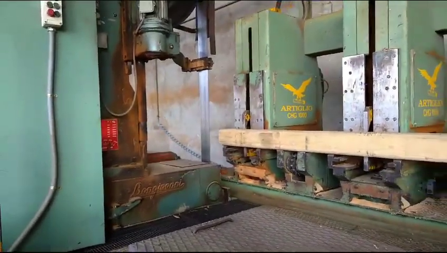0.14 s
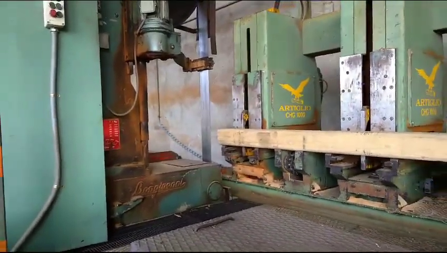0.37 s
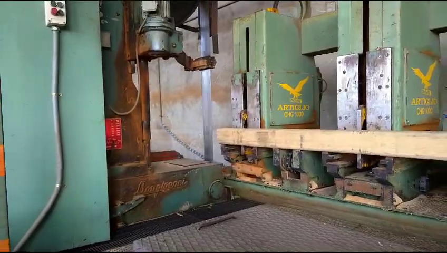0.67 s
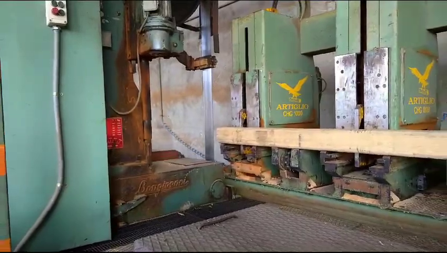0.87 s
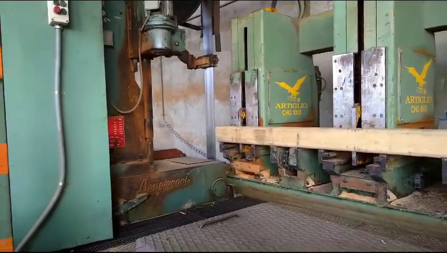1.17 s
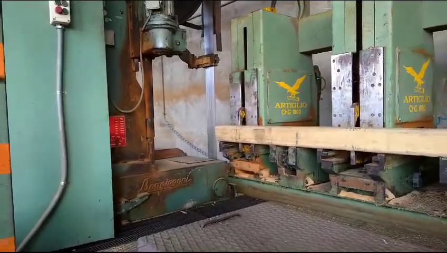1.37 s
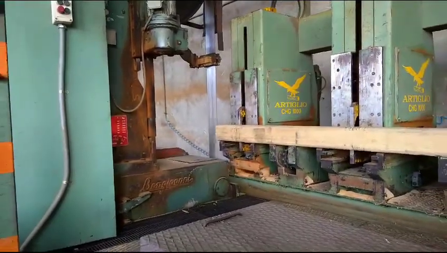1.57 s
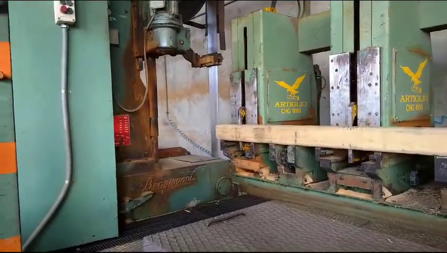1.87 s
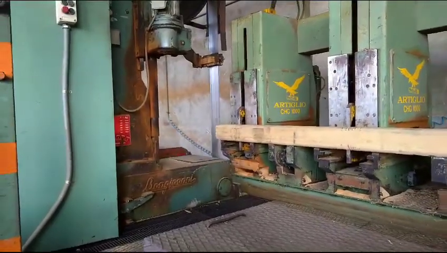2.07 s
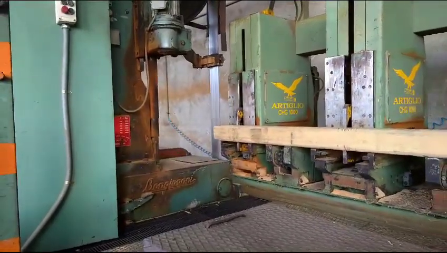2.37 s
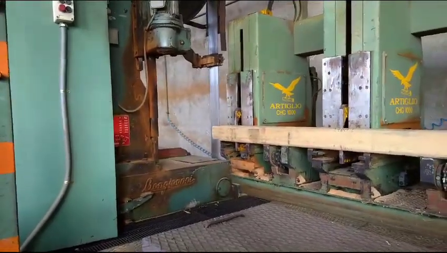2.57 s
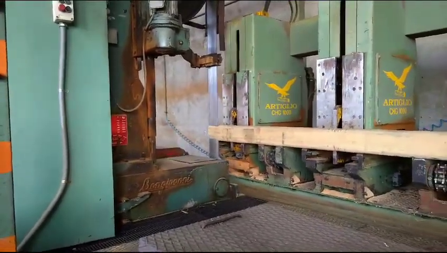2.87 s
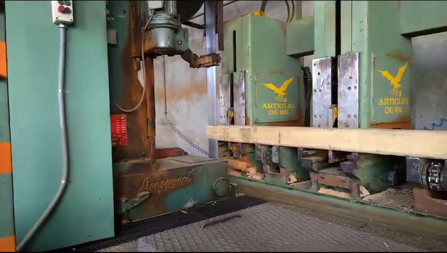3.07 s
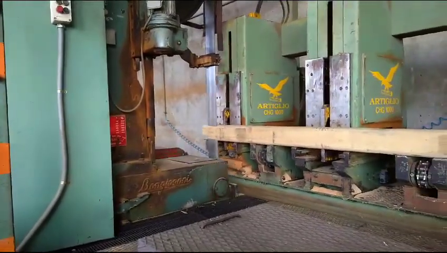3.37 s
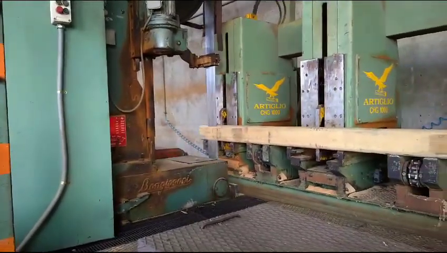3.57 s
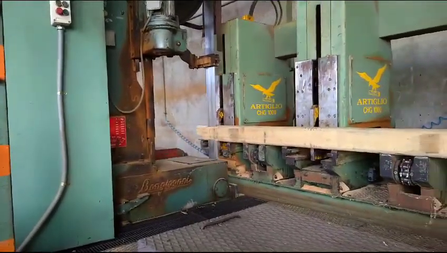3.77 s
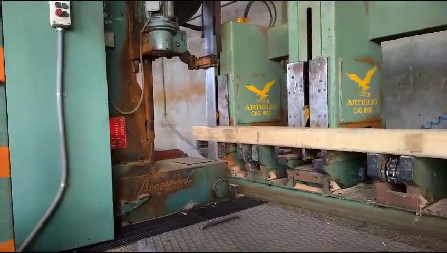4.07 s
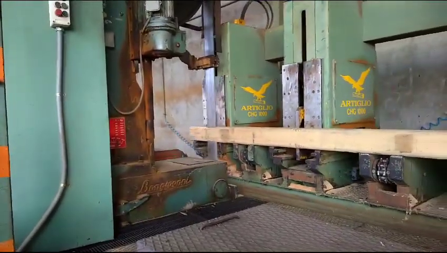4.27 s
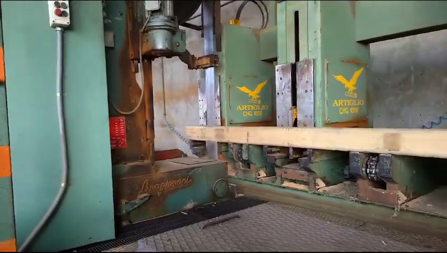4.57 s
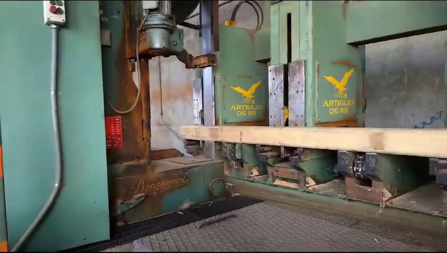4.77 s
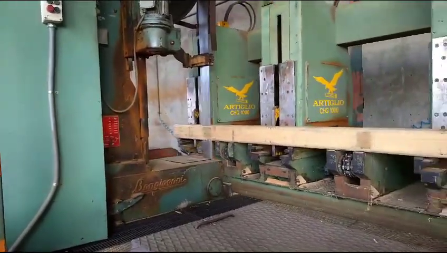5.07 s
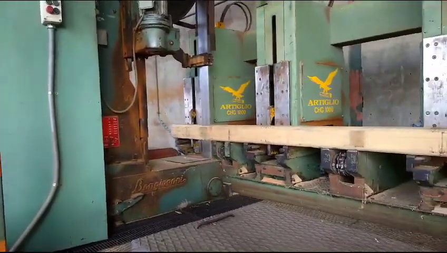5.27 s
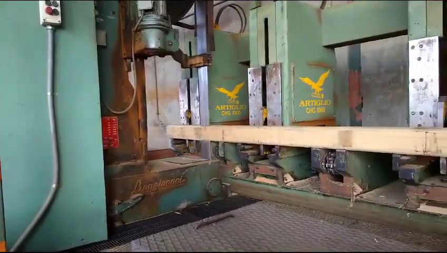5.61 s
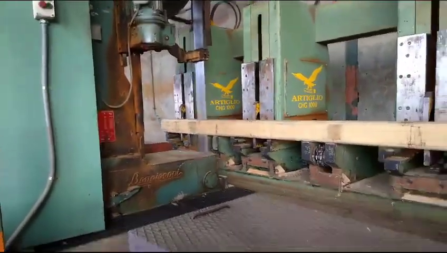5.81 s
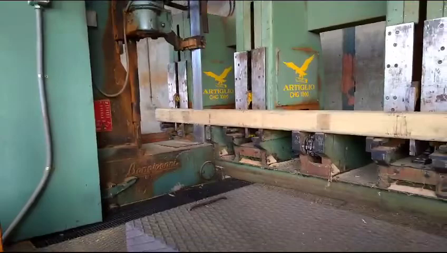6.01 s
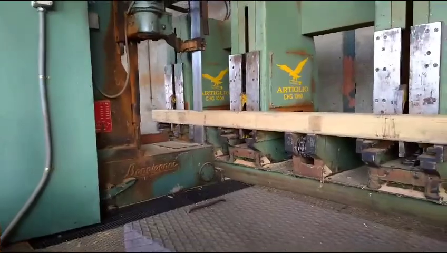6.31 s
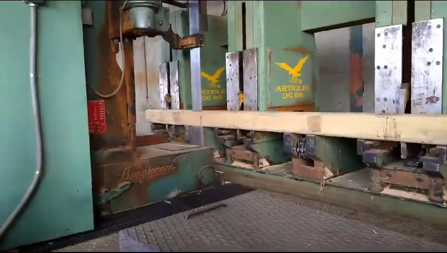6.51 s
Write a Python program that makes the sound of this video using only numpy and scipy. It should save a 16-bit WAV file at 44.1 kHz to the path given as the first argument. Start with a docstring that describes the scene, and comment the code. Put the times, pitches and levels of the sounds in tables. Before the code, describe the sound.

A large band saw idles in a sawmill shed, its rushing noise and thin tooth whistle pulsing nearly four times a second over motor hum. After just over a second the blade abruptly bites into a timber beam: a loud, rough whine and hissing torn chips, brightest at first, then slowly softer but continuous to the end. Stereo phone a few metres away, with short shed echo.

```python
"""Band saw biting into a beam in a sawmill shed

A large band saw idles, then bites into a timber beam that the carriage feeds slowly past. The running noise of
the blade loop repeats on every turn. In the cut each tooth strikes the wood, giving a rough whine on the tooth
rate over the hiss of chips. A phone with two microphone ports, a few metres away, hears it with the shed's
echo, over wavering motor tones and frame drones."""
import sys
import numpy as np
from scipy import signal
from scipy.fft import rfft, irfft, next_fast_len
from scipy.io import wavfile
from scipy.ndimage import uniform_filter1d, map_coordinates

SR = 44100
rng = np.random.default_rng(int(sys.argv[2]) if len(sys.argv) > 2 else 0)


def pcm_store(signal):
    """Save signal as 16-bit PCM."""
    levels = np.round(np.clip(np.atleast_2d(signal), -1, 1) * 32767)
    wavfile.write(sys.argv[1], SR, levels.astype(np.int16).T)


N = 293265

BITE_S, BITE_ATTACK_S = 1.285, 0.014  # the teeth reach the wood; time the bite takes to rise


def undb(db):
    """Decibels to gain."""
    return 10 ** (np.asarray(db) / 20)


def unit(x):
    """Scale to rms 1."""
    return x / np.sqrt(np.mean(x ** 2))


def curves(table):
    """Columns of a (s, value, ..) table at every sample."""
    s, *columns = np.transpose(table)
    return [np.interp(np.arange(N) / SR, s, c) for c in columns]


def over_hz(table, hz):
    """A (Hz, value) table read on a log-frequency axis."""
    f, v = np.transpose(table)
    return np.interp(np.log(hz + 1), np.log(f + 1), v)


def walk(rate):
    """Random levels held 1 / rate s and slewed twice, scaled to a spread near 1."""
    k = int(SR / rate)
    steps = np.repeat(rng.standard_normal(N // k + 1), k)
    slewed = uniform_filter1d(uniform_filter1d(steps, k), k)
    return unit(slewed)[:N] if len(slewed) == N else unit(slewed[:N])


def flickering(x, gain, flicker_db, rate):
    """Colour x by gain(Hz), each octave wavering in level on its own."""
    size = next_fast_len(N)
    hz = np.arange(size // 2 + 1) * SR / size
    spectrum = rfft(x, size) * gain(hz)
    octaves_up = np.log2(np.clip(hz, 2 ** 5, 2 ** 14))
    out = 0
    for octave in range(5, 15):
        share = np.clip(1 - abs(octaves_up - octave), 0, 1)
        band = irfft(spectrum * share, size)[..., :N]
        depth_db = flicker_db * (1.5 + 6 * (octave < 7))  # the lowest rumble is the most uneven
        out = out + band * undb(depth_db * walk(rate))
    return out


def since_bite(rise_s):
    """0 before the teeth reach the wood, then a straight rise to 1."""
    return np.clip((np.arange(N) / SR - BITE_S) / rise_s, 0, 1)


# Motor hum. Each row: time in seconds, upper tone in dB, lower tone in dB.
MOTOR_HUM = [(0, -53, -70), (.55, -48, -73), (.75, -61, -75), (1.3, -54, -74), (1.5, -46.5, -71),
             (2.05, -46, -65), (2.17, -55, -69), (2.3, -45, -72), (2.8, -52, -67), (3.4, -56.5, -63),
             (5.0, -56, -59.5), (5.5, -54, -63), (6.65, -63, -64)]
# Frame drones. Each row: time in seconds, lower tone in dB, upper tone in dB.
FRAME_DRONE = [(0.0, -62, -44), (0.11, -50, -47), (0.53, -60, -47.5), (1.78, -55, -48), (2.39, -63, -57),
               (4.09, -72, -53.5), (6.41, -70, -62), (6.65, -68, -59)]
MOTOR_HZ, DRONE_HZ = (300, 95), (238, 406.5)  # in the column order of the tables
HUM_WAVER_DB = 1.5


def hum():
    """Motor tones and frame drones: sines wavering in level and phase."""
    t = np.arange(N) / SR
    levels_db = curves(MOTOR_HUM) + curves(FRAME_DRONE)
    return sum(undb(db + HUM_WAVER_DB * walk(7.0)) * np.sin(2 * np.pi * hz * t + 0.3 * walk(5.3))
               for hz, db in zip(MOTOR_HZ + DRONE_HZ, levels_db))


SHED_T60_S = 0.39  # time for the echo to die by 60 dB
ECHO_SHIFT_S = .3  # the carriage moves, so the echo takes a new path this often


def shed(x):
    """Dense echo of the shed, different at each port and changing as the beam travels; treble dies sooner."""
    t, hop = np.arange(SR // 2) / SR, int(ECHO_SHIFT_S * SR)
    x, out = np.pad(x, (hop, 2 * hop)), np.zeros((2, N + 3 * hop + SR))
    fade = np.sin(np.pi * np.arange(2 * hop) / (2 * hop))
    for start in range(0, N + hop, hop):
        decay = np.exp(-np.log(1000) * t / SHED_T60_S) * (t > .006)  # first wall return after 6 ms
        tail = rng.standard_normal((2, len(t))) * decay
        bright = np.diff(tail, prepend=0) * np.exp(-t / 0.014)
        tail = signal.lfilter([1], [1, -.3], tail) + 0.15 * bright
        piece = x[start:start + 2 * hop] * fade
        echo = signal.fftconvolve(piece[None], tail / np.sqrt(np.sum(tail ** 2) / 2), axes=1)
        out[:, start:start + echo.shape[1]] += echo
    return out[:, hop:hop + N]


# Uneven tooth spacing round the blade loop, closer at the weld.
# Each row: place in turns, tooth rate in Hz, tooth whistle in relative dB.
BLADE_LOOP = [(0, 795.5, -1), (.16, 794, -10), (.24, 801, -10), (.29, 809, -10), (.39, 810, -10),
              (.43, 792, -11), (.58, 790, -12), (.7, 797, -10), (.8, 796, -3), (.9, 796, 1), (1, 795.5, -1)]
TURN_START = .985  # place on the loop at the start (turns)
TURN_S, LOADED_TURN_S, SLOWING_S = .27424, .2756, .3  # one turn free, one under load; time it takes to slow


def blade():
    """Place on the loop (turns), tooth phase (radians) and whistle level (dB) as the loop slows under load."""
    turn_s = TURN_S + (LOADED_TURN_S - TURN_S) * since_bite(SLOWING_S)
    place = (TURN_START + np.cumsum(1 / turn_s) / SR) % 1
    at, hz, db = np.transpose(BLADE_LOOP)
    tooth = 2 * np.pi * np.cumsum(np.interp(place, at, hz)) / SR
    return place, tooth, np.interp(place, at, db)


# Blade on its wheels and guides. Each row: time in seconds, level in dB.
RUNNING_LEVEL = [(0, -22), (1.4, -21), (2.0, -21), (3.4, -26), (4.2, -24), (5.2, -25.5), (6.65, -26.5)]
# Colour of the running noise. Each row: frequency in Hz, relative level in dB per Hz.
RUNNING_COLOUR = [(15, -66), (25, -35), (194, -20.5), (300, -14), (553, -8.5), (800, -5.5), (1000, -4.5),
                  (1760, -2), (2600, -6), (3180, -8.5), (6240, -9.5), (10000, -9.5), (13300, -14.5),
                  (15700, -20)]
# Machine frame modes. Each row: frequency in Hz, width in Hz, height in dB.
FRAME_MODES = [(240, 8, 4), (408, 12, 7), (445, 8, 4), (515, 10, 5), (600, 12, 8), (677, 12, 9),
               (1255.5, 25, 5), (1481, 32, 6.5), (1740, 57, 5), (2320, 44, 9), (2498, 35, 7),
               (3383, 160, 3.5), (5200, 60, 6.5)]
# How alike the two ports hear the running noise. Each row: frequency in Hz, likeness left to right (-1 to 1).
RUNNING_ALIKE = [(30, .2), (60, 0.14), (130, 0.62), (290, 0.69), (640, 0.78), (1410, 0.51), (3100, 0.29),
                 (6820, 0.23), (15000, -0.36)]
# Balance of the running noise between the ports. Each row: frequency in Hz, left minus right in dB.
RUNNING_BALANCE = [(60, -9), (110, 0), (200, -1), (380, 0.5), (700, 0), (1290, 0.5), (2380, 0),
                   (4400, -1.5), (8120, -2), (15000, -4)]
REPEAT_FREE, REPEAT_CUTTING = .92, .32  # share of the noise that repeats each turn; the wood shakes it loose


def running(place, tooth, whistle_db):
    """Rumble of the loop: every flaw comes round again, so most of the noise repeats; air hiss on top is new."""
    repeat = REPEAT_FREE + (REPEAT_CUTTING - REPEAT_FREE) * since_bite(BITE_ATTACK_S)
    size = int(TURN_S * SR)
    one_turn = rng.standard_normal((2, size))
    flaws = np.array([map_coordinates(row, [place * size], order=3, mode="grid-wrap") for row in one_turn])
    fresh = rng.standard_normal((2, N))
    dull = signal.butter(1, 3500, fs=SR, output="sos")
    hiss = fresh - signal.sosfilt(dull, fresh)
    loose = rng.standard_normal((2, N))
    noise = np.sqrt(repeat) * (signal.sosfilt(dull, flaws) + hiss) + np.sqrt(1 - repeat) * loose

    def gain(hz):
        """Colour and frame modes, shared out between mid and side."""
        alike = np.clip(over_hz(RUNNING_ALIKE, hz), -.9, .99)
        peaks_db = sum(d / (1 + (2 * (hz - f) / w) ** 2) for f, w, d in FRAME_MODES)
        return undb(over_hz(RUNNING_COLOUR, hz) + peaks_db) * np.sqrt([1 + alike, 1 - alike])

    mid, side = unit(flickering(noise, gain, flicker_db=.6, rate=9))
    pair = np.array([mid + side, mid - side])
    balance_db = over_hz(RUNNING_BALANCE, np.arange(N // 2 + 1) * SR / N)
    rumble = irfft(rfft(pair) * undb(np.outer([.5, -.5], balance_db)), N) / np.sqrt(2)
    # teeth chopping the air at the guides
    whistle_db = whistle_db - 14.5 + 5.3 * repeat + 1.9 * (1 - repeat) * walk(4.02)
    whistle = undb(whistle_db) * np.sin(tooth)
    return undb(curves(RUNNING_LEVEL)[0]) * (rumble + whistle)


def partial(tooth, k, level_db, steady):
    """Multiple k of the tooth rate; wood grain makes bites differ, which smears all but the steady share."""
    rate = 90 + 16 * k
    smear = walk(rate) + 1j * walk(rate)
    bite = np.sqrt(steady) + np.sqrt((1 - steady) / 2) * smear
    return undb(level_db) * np.sqrt(2) * np.real(bite * np.exp(1j * (k * tooth + 1.0 * walk(6))))


# Spells in which one multiple of the tooth rate meets a resonance of the moving beam and sings out.
# Each row: start in seconds, length in seconds, level in dB, multiple of the tooth rate.
SINGING_SPELLS = [(1.29, 0.16, -23.5, 5), (1.30, 0.15, -35, 6), (1.352, 0.078, -35, 2),
                  (1.31, 0.32, -30, 3), (1.576, 0.29, -34, 3), (1.93, .1, -42, 3), (1.402, 0.15, -31, 4),
                  (1.45, 0.55, -35, 5), (1.82, 0.2, -36, 4), (1.557, 0.246, -27.5, 2),
                  (1.56, 0.066, -32, 8), (1.92, 0.14, -28.5, 2), (2.26, 0.3, -37, 2), (2.59, 0.27, -35, 2),
                  (2.88, 0.29, -32, 2), (2.28, 0.23, -45, 3), (2.735, 0.27, -39, 3), (2.59, 0.26, -33.5, 4),
                  (2.856, .23, -30.5, 4), (3.09, 0.33, -37, 4), (3.403, 0.3, -37.5, 4),
                  (2.905, 0.13, -33, 7), (3.10, 0.057, -37, 3), (3.224, 0.11, -41, 7), (3.324, 0.4, -36, 5),
                  (3.497, 0.068, -26.5, 2), (3.52, 0.18, -39, 3), (4.027, .08, -37, 5),
                  (4.05, 0.16, -37, 8), (4.2, .32, -52, 6), (4.52, .14, -40.5, 4), (4.576, 0.22, -39, 5),
                  (4.827, 0.093, -34.5, 5), (4.9, .12, -40, 6), (5.1, 0.071, -43, 4), (5.6, 0.2, -42, 6),
                  (5.7, 0.29, -47, 3), (6.1, 0.52, -40, 3), (6.25, .3, -47, 4), (4.194, 1.2, -37, 8),
                  (4.75, 0.54, -39, 7), (5.88, 0.22, -33, 8), (6.45, .2, -39, 7), (5.6, 0.33, -35, 7),
                  (6.2, 0.1, -30.5, 8), (1.507, 0.13, -36, 4), (1.68, 0.17, -33.5, 3),
                  (2.12, 0.084, -37, 5), (1.31, .12, -32, 11), (1.48, .3, -29, 12), (1.85, 0.4, -31.5, 9),
                  (2.0, 0.28, -24.5, 12), (2.1, .35, -35, 10), (3.157, 0.041, -24, 10),
                  (3.3, .2, -27.5, 12), (3.65, 0.23, -33, 10), (5.1, 0.5, -36, 12), (6.25, 0.5, -37, 9)]
SING_EDGE_S = .06  # time to swell and to fade


def singing(multiple):
    """Gain of one multiple over its spells of beam resonance: swell, hold, fade."""
    t = np.arange(N) / SR
    return sum(undb(db) * np.clip(np.minimum(t - s, s + length - t) / SING_EDGE_S + .5, 0, 1) ** 2
               for s, length, db, k in SINGING_SPELLS if round(k) == multiple)


# Low multiples that the beam carries all through the cut. Each row: multiple of the tooth rate,
# level in dB over the cut, steady share (0-1), steady share when singing (0-1).
BEAM_MULTIPLES = [(2, -18, .2, .45), (3, -18, .2, .4), (4, -25, .4, .93), (5, -26, .4, .9),
                  (6, -21, .3, .4), (7, -18, .4, .45), (8, -16.5, .3, .3)]
BEAM_WAVER_DB, SING_WAVER_DB = 2.5, 1.3


def singing_beam(tooth, cut_db, weld_db):
    """Tooth strikes shake the beam at low multiples of the tooth rate, which sing out at its resonances."""
    beam = 0
    for k, line_db, steady, sung in BEAM_MULTIPLES:
        level_db = cut_db + line_db + weld_db * k / 4 + BEAM_WAVER_DB * walk(20)
        sing_db = weld_db * (k / 4) ** 2 + SING_WAVER_DB * walk(16)
        beam = beam + partial(tooth, k, level_db, steady) + singing(k) * partial(tooth, k, sing_db, sung)
    return beam


SQUEAL_S, SQUEAL_HALF_S, SQUEAL_DB = 5.56, 0.098, -25  # centre, time to swell and to fade, level at its height


def squeal(tooth):
    """One clean squeal on the third multiple: a nearly steady partial that swells and fades."""
    swell = np.clip(1 - abs(np.arange(N) / SR - SQUEAL_S) / SQUEAL_HALF_S, 0, 1)
    return np.sin(np.pi / 2 * swell) * partial(tooth, k=3, level_db=SQUEAL_DB, steady=.95)


# Upper multiples in the blade whine. Each row: multiple of the tooth rate, level in dB over the cut at the
# start of the scene, the same at its end; the level slides straight between them.
WHINE_MULTIPLES = [(9, -15, -14), (10, -15, -16), (11, -14, -17), (12, -8, -14), (13, -11, -14),
                   (14, -14, -18), (15, -17, -17), (16, -16, -16), (17, -17, -17), (18, -19, -19),
                   (19, -18, -17)]
WHINE_WAVER_DB, WHINE_WAVER_PER_S = 1.9, 13
CLEAN_WHINE = 6  # multiple of the tooth rate at which half of the blade whine has turned rough


def blade_whine(tooth, cut_db, weld_db):
    """The blade whines at upper multiples of the tooth rate, rougher the higher they lie."""
    whine = 0
    for k, first_db, last_db in WHINE_MULTIPLES:
        level = np.hypot(undb(cut_db + np.linspace(first_db, last_db, N)), singing(k))
        waver_db = weld_db / 2 + WHINE_WAVER_DB * walk(WHINE_WAVER_PER_S)
        whine = whine + level * partial(tooth, k, waver_db, steady=1 / (1 + (k / CLEAN_WHINE) ** 4))
    return whine


# Colour of the tearing chips. Each row: frequency in Hz, relative level in dB per Hz.
CHIPS_COLOUR = [(20, -75), (120, -43), (530, -24), (900, -14), (1290, -21), (1560, -10.5), (1960, -9),
                (2370, -5.5), (2840, -7.5), (3870, -6.5), (5960, -5.5), (6180, -4), (6710, -5.5),
                (9730, -0.5), (12500, -6.5), (15700, -12.5)]
# fine dust hisses above this pitch, fading out by the last time as the cut deepens
SPRAY_HZ, SPRAY_DB, SPRAY_ENDS_S = 11000, -11, 2.9


def torn_chips(tooth):
    """Chips tear off once per tooth: noise pulsing at the tooth rate, with a hiss of fine dust on top."""
    torn = rng.standard_normal(N) * (1 + 0.72 * np.cos(tooth))
    chips = unit(flickering(torn, lambda hz: undb(over_hz(CHIPS_COLOUR, hz)), flicker_db=0.5, rate=16))
    high = signal.butter(2, SPRAY_HZ, "high", fs=SR, output="sos")
    dust = signal.sosfilt(high, rng.standard_normal(N))
    return chips + undb(SPRAY_DB) * dust * np.sqrt(1 - since_bite(SPRAY_ENDS_S - BITE_S))


# The cut as it stands before the phone. Each row: time in seconds, level in dB, left minus right in dB.
CUT_LEVEL = [(1.29, -17.5, -2.5), (1.75, -18.5, -1.5), (2.2, -19, -2.5), (2.63, -21, -2),
             (2.86, -22.5, -0.5), (3.4, -23.5, 0), (3.62, -23.5, 0.5), (3.68, -26.5, 0), (3.76, -23.5, 0),
             (4.1, -25.5, 0), (5.4, -25.5, 0), (6.11, -28, 0), (6.65, -25.5, 1)]
FEED_JUDDER_DB, FEED_JUDDER_PER_S = 1, 13  # the bite wavers as the carriage feeds


def cutting(tooth):
    """Teeth strike the wood: the beam sings, the blade whines, chips tear off once per tooth."""
    db, pan_db = curves(CUT_LEVEL)
    db = db + FEED_JUDDER_DB * walk(FEED_JUDDER_PER_S)
    # the close-set teeth at the weld take thinner bites
    tooth_hz = np.gradient(tooth) * SR / (2 * np.pi)
    weld_db = -.3 * np.clip(tooth_hz - 798, 0, None)
    beam = singing_beam(tooth, db, weld_db) + squeal(tooth)
    rasp = blade_whine(tooth, db, weld_db) + undb(db - 4.5) * torn_chips(tooth)
    bite = since_bite(BITE_ATTACK_S)
    return bite * beam, bite * rasp, np.clip(pan_db, -6, 6)


PORT_LAG_S = 1.8e-5  # the right microphone port hears the cut later
# echo sent by rasp and beam; the beam sings towards the phone, so less of it comes by the walls
SHED_DB, BEAM_SHED_DB = 4, -11


def scene():
    """Saw running, cut with its echo, motor hum, as they reach the left and right ports."""
    place, tooth, whistle_db = blade()
    beam, rasp, pan_db = cutting(tooth)
    direct = beam + rasp
    hz = np.arange(N // 2 + 1) * SR / N
    late = irfft(rfft(direct) * np.exp(-2j * np.pi * hz * PORT_LAG_S), N)
    echo = shed(undb(SHED_DB) * rasp + undb(BEAM_SHED_DB) * beam)
    heard = (np.array([direct, late]) + echo) * undb(np.array([pan_db, -pan_db]) / 2)
    return heard + running(place, tooth, whistle_db) + hum()


TOP_HZ = 15760  # highest pitch the phone keeps


def record(dry):
    """The phone rounds the loudest peaks and cuts the top."""
    return signal.sosfilt(signal.ellip(16, .3, 90, TOP_HZ, fs=SR, output="sos"), np.tanh(dry))


dry = scene()
out = record(dry)
pcm_store(out)
```